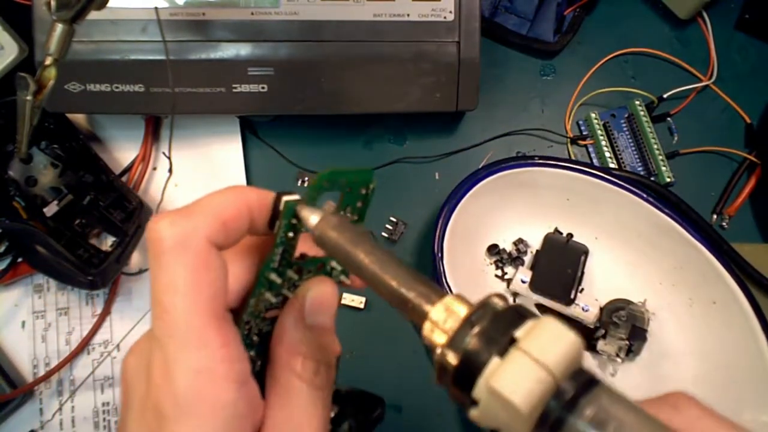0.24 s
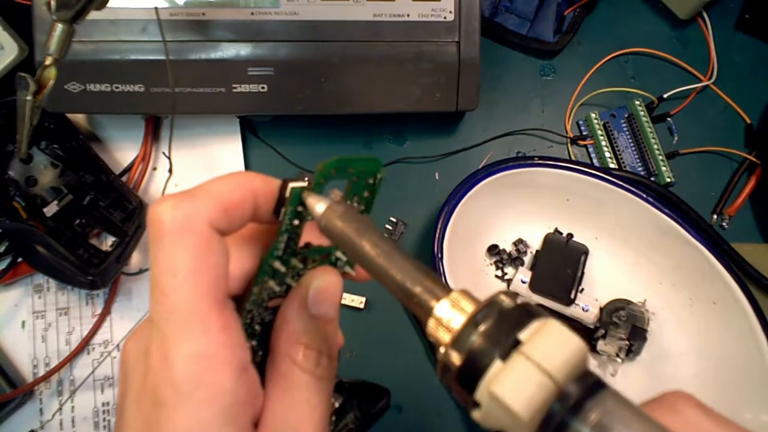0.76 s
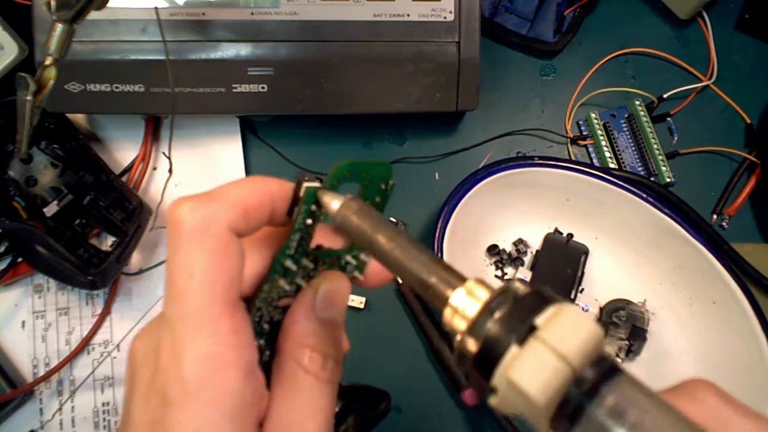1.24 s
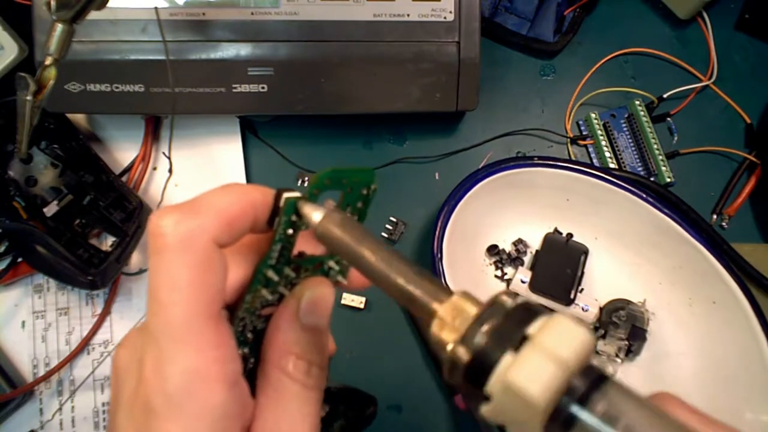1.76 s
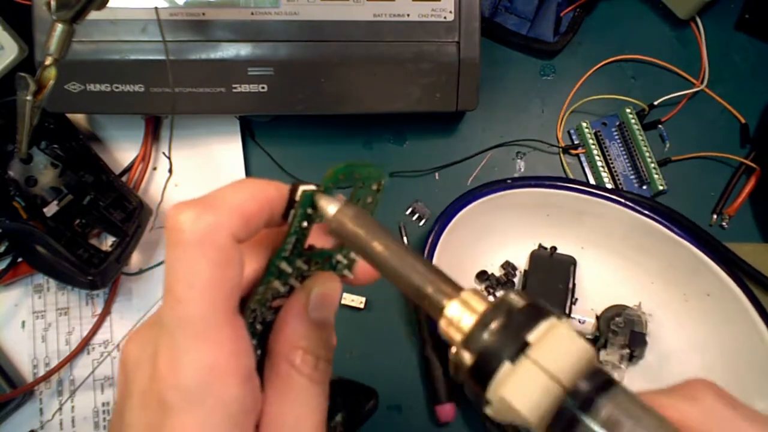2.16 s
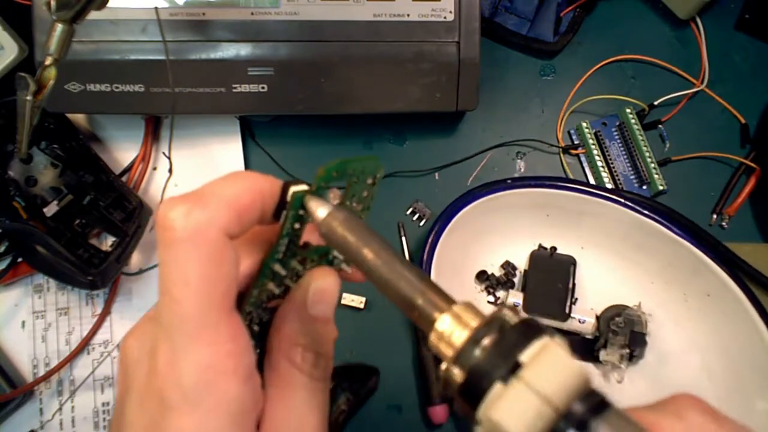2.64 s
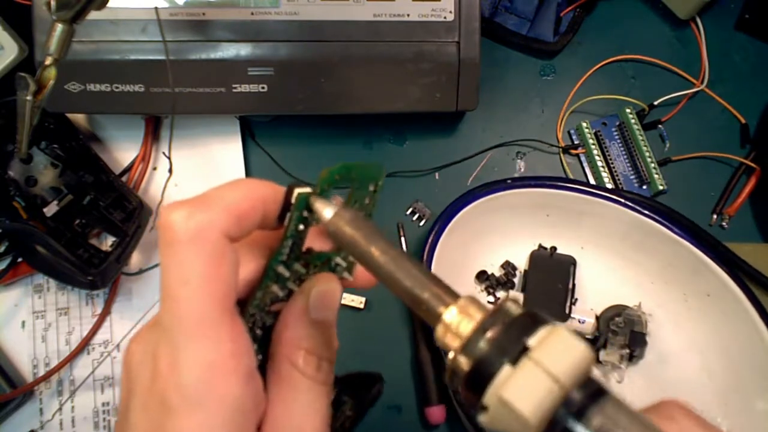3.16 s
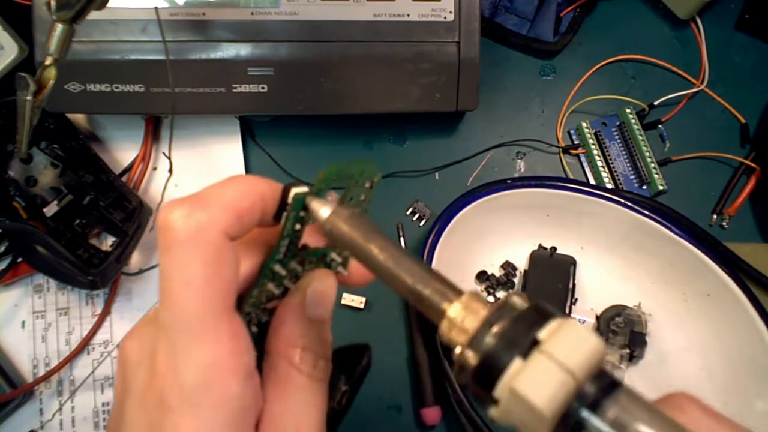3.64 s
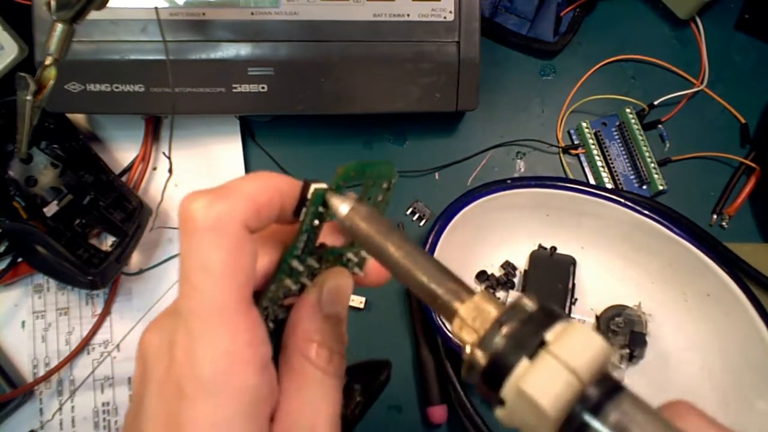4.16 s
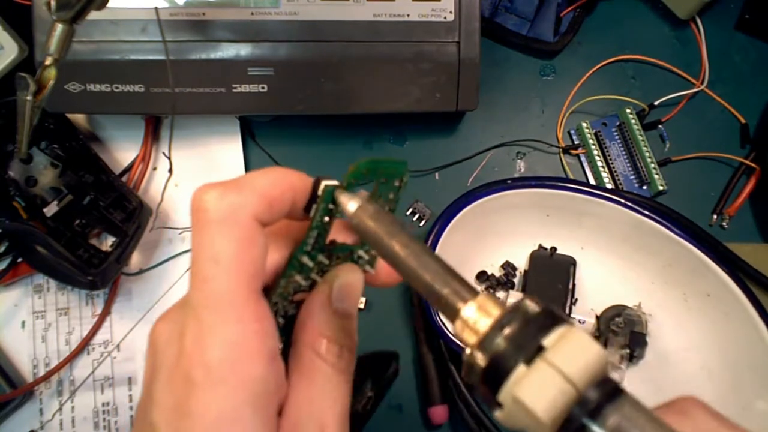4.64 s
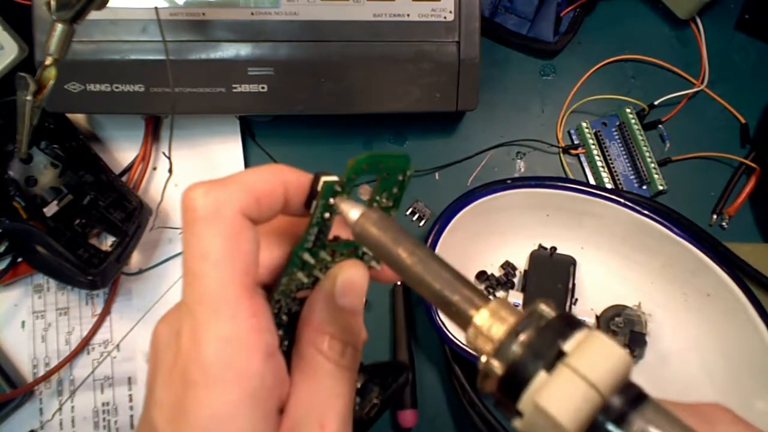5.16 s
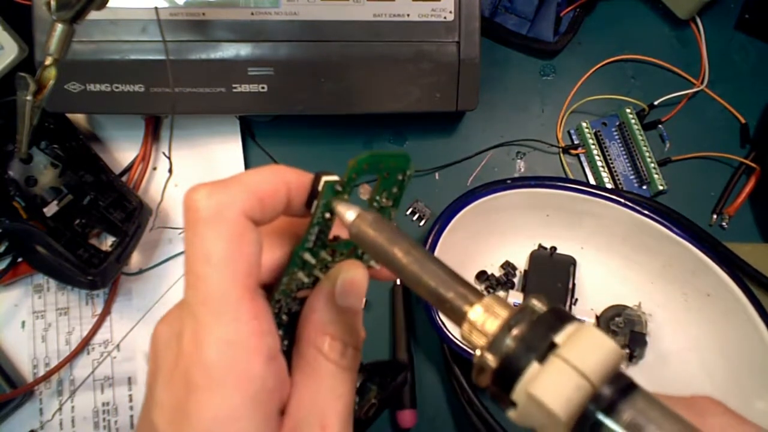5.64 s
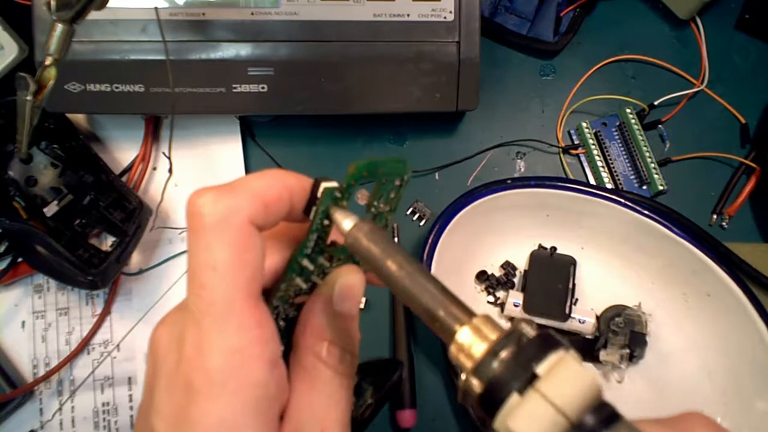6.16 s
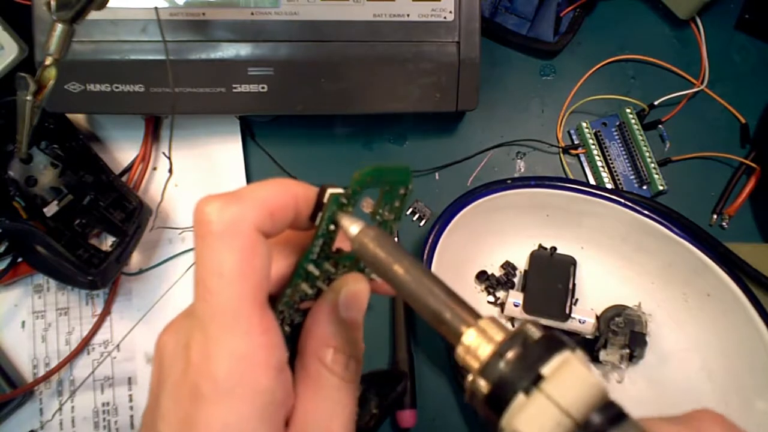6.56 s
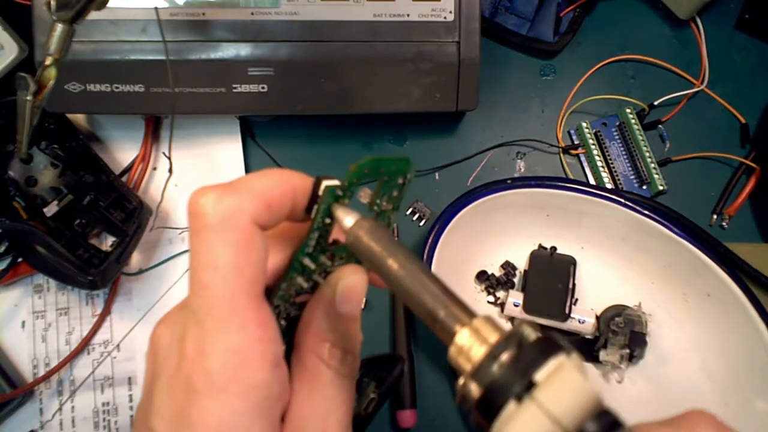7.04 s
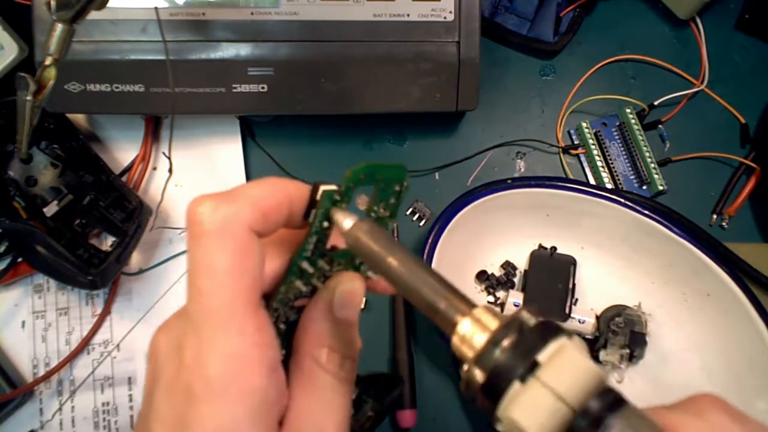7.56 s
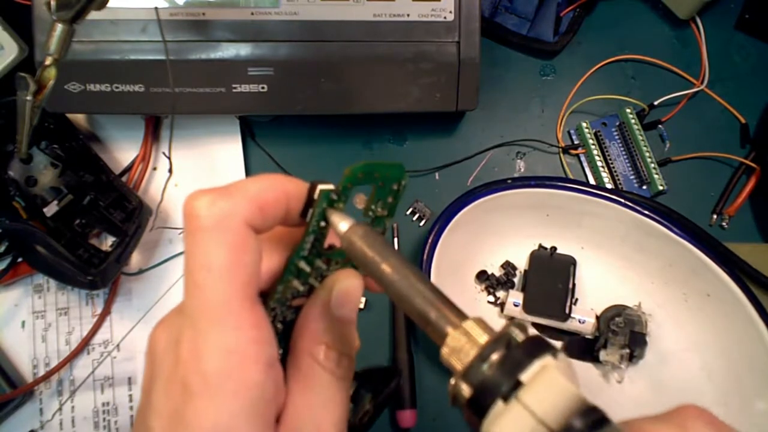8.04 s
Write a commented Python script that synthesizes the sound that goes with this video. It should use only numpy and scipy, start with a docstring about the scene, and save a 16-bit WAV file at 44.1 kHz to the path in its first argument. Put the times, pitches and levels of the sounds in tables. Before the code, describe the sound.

A steady soft fan and faint mains hum fill a small room. After a few solder ticks, a switch snaps and a diaphragm pump jumps into a harsh, rattling buzz, labouring under suction before running freer. It clicks off about four seconds later, coasting down with a thin hiss. Tiny ticks and spits follow, then another snap and the pump buzzes to the end. Close microphone.

```python
"""Desoldering gun at a bench

A trigger switch snaps and starts a diaphragm vacuum pump, twice. Each stroke puffs out air, a harmonic
series locked to the crank, and shakes the mechanism: contact clicks and air noise excite housing modes.
Solder spits and flux pops are short resonant noise bursts; the motor knocks in its mount at each start,
and a narrow hiss follows each stop. A fan (coloured noise) and mains hum (sines) run throughout."""
import sys
import numpy as np
from scipy import signal
from scipy.fft import rfft, irfft
from scipy.io import wavfile

SR = 44100
rng = np.random.default_rng(int(sys.argv[2]) if len(sys.argv) > 2 else 0)


def to_wav(s):
    """Save 16-bit WAV."""
    ch = np.atleast_2d(s).T  # columns
    pcm = np.round(np.clip(ch, -1, 1) * 32767)  # PCM
    wavfile.write(sys.argv[1], SR, pcm.astype(np.int16))


N = 366471
TIME = np.arange(N) / SR

# Fan noise spectrum: f/Hz, level/dB (relative spectral density)
FAN_SPECTRUM = [(30, -46), (120, -28), (200, -11.5), (380, -1), (600, -5.5), (950, -6.5), (1500, -6.5),
                (2450, -7.5), (2900, -15.5), (3600, -11.5), (4500, -16), (7500, -19.5), (9500, -24),
                (10800, -32.5), (15500, -41)]
# Fan resonances: f/Hz, width/Hz, level/dB (against the fan noise)
FAN_RESONANCES = [(364, 15, 3), (782, 7.4, 10), (1165, 21, -6), (1429, 10, 10.5), (1540, 22, 2),
                  (2330, 17, -10), (3380, 110, -12), (5000, 260, -0.5), (6370, 130, 1), (7400, 360, -5),
                  (8340, 120, -8), (9600, 110, 1)]
# Mains hum: f/Hz, level/dB (rms)
HUM_TONES = [(100, -79), (150, -73.5), (199.5, -67), (248.5, -64)]
# Solder spitting and the nozzle ticking on the joint:
# t/s, peak level/dB, f/Hz, width/Hz (of each of two resonator passes)
SOLDER_SPITS = [(0.201, -36, 3170, 4000), (0.787, -28, 6650, 5930), (0.909, -26, 5330, 700),
                (0.909, -29, 8000, 2500), (1.741, -32, 8800, 2980), (1.836, -25, 7150, 5500),
                (6.085, -45, 9000, 5010), (6.146, -39.5, 3000, 3000), (6.172, -46, 13100, 1000),
                (6.268, -44, 8500, 7000), (6.359, -50, 9200, 400), (6.365, -46, 9100, 400),
                (6.443, -51, 9200, 1500), (6.506, -44, 8500, 3000), (6.559, -45, 9200, 1200),
                (6.588, -51, 8600, 900), (6.622, -48, 8600, 500), (6.64, -32, 4300, 3200),
                (6.651, -48, 5200, 2800), (6.665, -41, 4080, 1000), (6.666, -47, 8900, 700),
                (6.8, -29, 6000, 5000), (6.813, -26, 5900, 5000), (6.8175, -27, 6450, 5000),
                (6.865, -32, 5700, 3500), (6.914, -29, 5300, 4100), (6.932, -30, 5200, 3000),
                (7.008, -40, 9000, 300), (7.09, -27, 7000, 7000), (7.131, -26, 5400, 4000)]
# Trigger switch snaps: t/s, peak level/dB, crack level/dB (against the modes), crack t60/s
SWITCH_SNAPS = [(0.6644, -22.5, 9, 0.013), (0.667, -18.5, 3, 0.009), (4.8494, -20, 8, 0.021),
                (4.873, -34, 3, 0.018), (6.6982, -25, 15, 0.022)]
# Modes of the switch: f/Hz, level/dB (relative), t60/s
SWITCH_MODES = [(1710, -11, 0.008), (3450, -6, 0.011), (4050, -2, 0.009), (5000, -14, 0.013),
                (5700, -14, 0.01), (6900, -9, 0.014), (8600, -15, .01)]
# Spectrum of the switch's crack: f/Hz, level/dB (relative spectral density)
CRACK_SPECTRUM = [(200, -14), (1000, -7), (2600, -5), (3600, 2.5), (8500, -1), (11000, -11.5), (15500, -17)]
# Trigger held: on t/s, off t/s, nozzle seal by solder/(0-1), joint opens t/s, vacuum bleed time/s,
# speed settling time/s, puff level/dB, rattle level/dB, resting crank angle/turns, flux pops/(1/s)
PUMP_RUNS = [(0.700, 4.858, 1, 2.68, 0.45, 0.122, -36.5, -34, 0.1, 10),
             (6.7224, 8.4, 0.4, 7.05, 0.12, 0.1, -36.5, -33.5, 0.56, 450)]
# Pump tones; the drive repeats every third stroke:
# f/(stroke rate), level running free/dB, level under suction/dB (both relative)
PUMP_TONES = [(2, -17.7, -17.5), (3, -11.8, -11.5), (4, -10, -8.5), (14 / 3, -32, -25), (5, -18.5, -18.5),
              (16 / 3, -38, -23), (17 / 3, -33, -23), (6, -28, -22), (7, -19, -17), (8, -19.5, -26),
              (9, -23, -12), (28 / 3, -36, -26), (29 / 3, -36, -21), (10, -20, -19), (32 / 3, -27, -15),
              (11, -17, -23), (35 / 3, -28, -7.5), (12, -4.5, -12), (38 / 3, -30, -12), (13, -6, -15),
              (40 / 3, -36, -18), (41 / 3, -36, -14), (14, -24, -22), (43 / 3, -34, -24),
              (44 / 3, -40, -19), (46 / 3, -36, -23), (47 / 3, -36, -21), (16, -20, -23), (20, -30, -21),
              (21, -22, -14.5), (23, -21, -25), (24, -28, -21), (27, -30, -21), (29, -17, -20),
              (33, -19, -20)]
# Rough tones of the bearing slipping with no load: f/(stroke rate), level/dB (relative)
BEARING_TONES = [(4.52, -18), (5.5, -17.5), (9.6, -19), (10.62, -13), (11.52, -10), (11.76, -14),
                 (12.42, -14), (13.5, -17), (16.1, -18), (16.9, -17)]
# Whine of the labouring motor: f/(stroke rate), level/dB (relative)
WHINE_PARTIALS = [(10, -4), (11, -12), (12, -5), (13, -3), (14, -2), (15, -7)]
# Resonances of the motor mount: f/Hz, width/Hz, level/dB (relative)
MOUNT_RESONANCES = [(785, 70, 0), (1055, 110, 2)]
# Low room modes: f/Hz, width/Hz, level/dB (against the direct sound)
LOW_ROOM_MODES = [(136.6, 7.8, 9.5), (161.2, 7.4, 9.5), (212, 6.6, 13), (242.2, 11.6, 6.5),
                  (309.8, 22.5, 3), (329.7, 6.2, -0.3)]
# Broad spectrum of the rattle: f/Hz, level/dB (relative spectral density)
RATTLE_SPECTRUM = [(30, -34), (75, -15), (140, -15.5), (260, 3.5), (450, -1), (560, -11), (780, -8),
                   (1200, -4), (1600, -4), (2200, -1), (3380, -1.5), (3530, -13), (4100, -9.5),
                   (5100, -10.5), (9300, -16.5), (10400, -22), (15500, -32.5)]
# Housing resonances: f/Hz, width/Hz, level/dB (relative), strongest drive/(turns after the puff)
HOUSING_MODES = [(382, 5.9, 11, 0.092), (744, 53, 3.5, 0.76), (893, 25, 12, 1), (943, 55, 11, 0.66),
                 (1005, 40, 5, 0.73), (1074, 70, 13, 0.56), (1290, 104, 3, 1), (1380, 40, 5.5, 0.55),
                 (1425, 16, 13, 0.54), (1780, 39, 2.5, 0.61), (1910, 150, 1.5, 1), (2041, 20, 9, 0.81),
                 (2094, 15.8, 11, 0.71), (2342, 6.5, -4, 0.79), (2391, 22, 9.5, 0.6), (2580, 38, 3, 0.36),
                 (2937, 46, 9, 0.51), (3016, 18, 6.5, 0.39), (3155, 21, 6, 0.61), (3306, 37, 9, 0.64),
                 (3375, 43, 8.5, 0.61), (4620, 130, -5, 0.98), (5420, 54, -7.5, 0.89),
                 (6250, 115, -12.5, 0.79), (6600, 200, -10.5, 0.5), (6830, 240, -6.5, 0.71),
                 (7490, 240, -5, 0.75), (9540, 42, -8, 0.77)]
# Knocks of the motor in its mount as the current comes on: t/s, peak level/dB
MOUNT_KICKS = [(0.7025, -28), (6.7235, -35)]

# the hot nozzle melts into the second joint
MELT_FROM_S, MELT_TO_S = 5.2, 7.5
# stroke rate: running free, gained per second of elapsed time as it warms, lost under full suction
FREE_HZ, WARM_HZ_PER_S, SUCTION_SAG_HZ = 82.5, 0.11, 1.4
# the motor jumps to this much below its speed, then closes the gap
START_LAG_HZ = 21
# puffs: build-up, decay on release (on top of the coast-down), least share left while coasting
PUFF_ATTACK_S, PUFF_RELEASE_DB_PER_S, PUFF_COAST_SHARE = 0.082, 217, 0.26
# rattle: share at the first stroke, rise, decay of its bright part on release
RATTLE_FIRST_SHARE, RATTLE_ATTACK_S, RATTLE_RELEASE_DB_PER_S = 0.5, 0.1, 111
# whine against the puffs: at speed, extra while labouring, and how long that lasts
WHINE_DB, WHINE_LABOUR_DB, LABOUR_S = -26, 26, 0.57
# linkage clatter against the valves; fade of the knocking as the motor coasts
LINKAGE_DB, COAST_FADE_S = 4.5, 0.13
# build-up of the drive's tones; swing of the housing's drive either way within each stroke
DRIVE_BUILD_S, RING_SWELL_DB = 0.22, 5
# high-pass corners: contact clicks, radiation from the small housing
CONTACT_LOW_HZ, RADIATED_LOW_HZ = 1350, 86
# hiss after the stop: top level, delay of its top, half length
LEAK_DB, LEAK_DELAY_S, LEAK_SPREAD_S = -58, 0.14, 0.13


def from_db(db):
    """Amplitude ratio: twenty decibels are a factor of ten."""
    return 10 ** (np.asarray(db) / 20)


def rms_one(x):
    """Power normalization to a root mean square of 1."""
    return x / np.sqrt(np.mean(x ** 2) + 1e-20)


def drift(rate):
    """Low-pass filtered noise: a smooth random course of spread 1."""
    step = 40
    r = np.exp(-2 * np.pi * step * rate / SR)
    noise = rng.standard_normal(N // step + 2002)
    slow = signal.lfilter([1], [1, -2 * r, r * r], noise)[2000:]
    return np.interp(np.arange(N) / step, np.arange(len(slow)), rms_one(slow))


def flutter(rate):
    """Complex random modulation: strength and phase both wander, with mean power 1."""
    return (drift(rate) + 1j * drift(rate)) / np.sqrt(2)


def colour(x, spectrum, size=4096):
    """Minimum-phase filtering: a folded cepstrum gives a causal filter of the wanted spectrum."""
    hz, db = np.transpose(spectrum)
    grid = np.maximum(np.arange(size // 2 + 1) * SR / size, 1)
    cepstrum = irfft(np.log(from_db(np.interp(np.log(grid), np.log(hz), db))))
    cepstrum[1:size // 2] *= 2
    cepstrum[size // 2 + 1:] = 0
    return signal.oaconvolve(x, irfft(np.exp(rfft(cepstrum))))[:N]


def resonance(x, hz, width):
    """Damped oscillator: a two-pole resonance with gain 1 at its peak."""
    r = np.exp(-np.pi * width / SR)
    zeros = np.array([1, 0, -1]) * (1 - r * r) / 2
    poles = [1, -2 * r * np.cos(2 * np.pi * hz / SR), r * r]
    return signal.lfilter(zeros, poles, x + 1e-18)


def high_pass(x, order, hz):
    """Butterworth high-pass: maximally flat above its corner."""
    return signal.sosfilt(signal.butter(order, hz, "high", fs=SR, output="sos"), x)


def add(out, s, sound, peak_db):
    """Superposition: add a short sound at a given time and peak level."""
    at = int(s * SR)
    out[at:at + len(sound)] += (from_db(peak_db) * sound / np.abs(sound).max())[:N - at]


def ringing_burst(length, hz, width_hz, t60):
    """Resonant excitation: decaying noise passes twice through one resonance."""
    t = TIME[:length]
    burst = rng.standard_normal(len(t)) * from_db(-60 * t / t60)
    return resonance(resonance(burst, hz, width_hz), hz, width_hz)


def since(s):
    """Elapsed time in seconds after a moment; zero before it."""
    return np.maximum(TIME - s, 0)


def run_in_force():
    """Piecewise-constant control: each run column per sample, from the latest press (first run before)."""
    rows = np.array(PUMP_RUNS)
    return rows[np.maximum(np.searchsorted(rows[:, 0], TIME) - 1, 0)].T


def background():
    """Broadband flow noise with faint resonances and slow level drift, plus steady mains hum."""
    air = colour(rng.standard_normal(N), FAN_SPECTRUM)
    fan = air + sum(from_db(db) * resonance(air, hz, width) for hz, width, db in FAN_RESONANCES)
    hum = sum(from_db(db) * np.sqrt(2) * np.sin(2 * np.pi * (hz * TIME + rng.random()))
              for hz, db in HUM_TONES)
    level_db = -50 + 0.9 * drift(0.85)
    return from_db(level_db) * rms_one(fan) + hum


def spits(t60):
    """Impulsive excitation: each spit is a tiny noise burst with a pitch of its own."""
    out = np.zeros(N)
    for s, peak_db, hz, width in SOLDER_SPITS:
        add(out, s, ringing_burst(SR // 20, hz, width, t60), peak_db)
    return out


def bench(x, wet_db, t60):
    """Diffuse reverberation: bench and nearby walls return an exponentially decaying noise tail."""
    t = TIME[:SR // 3]
    tail = rng.standard_normal(len(t)) * from_db(-60 * t / t60) * (t > .003)
    return x + from_db(wet_db) * signal.oaconvolve(x, tail / np.linalg.norm(tail))[:N]


def trigger(rise_s):
    """Modal impact: the switch snaps with a noisy crack and a few short modes."""
    out, t = np.zeros(N), TIME[:SR // 20]
    for s, peak_db, crack_db, crack_t60 in SWITCH_SNAPS:
        rings = sum(from_db(db - 60 * t / t60) * np.sin(2 * np.pi * hz * t) * rng.choice([-1, 1])
                    for hz, db, t60 in SWITCH_MODES)
        noise = from_db(crack_db - 60 * t / crack_t60) * rng.standard_normal(len(t))
        crack = colour(noise, CRACK_SPECTRUM)[:len(t)]
        # the contacts scrape home during the rise
        add(out, s, (rings + crack) * np.minimum(t / rise_s, 1), peak_db)
    return out


def crank(on, off, suction, lag_hz, spin_up_s, coast_s):
    """Rotation as integrated speed: spin-up, sag under suction, coasting; gives turns and motion gain."""
    speed = FREE_HZ + WARM_HZ_PER_S * TIME - SUCTION_SAG_HZ * suction - lag_hz
    rise = 1 - np.exp(-since(on) / spin_up_s)
    coast = np.clip(1 - since(off) / coast_s, 0, 1)
    return np.cumsum(speed * rise * coast) / SR, (TIME > on) * np.sqrt(coast)


def whine(angle, flutter_db):
    """Source and resonator: the motor's partials swell as they glide through the mount's resonances."""
    partials = sum(from_db(db + flutter_db * drift(8.0)) * np.cos(multiple * angle + rng.normal(0, 1))
                   for multiple, db in WHINE_PARTIALS)
    return sum(from_db(db) * resonance(partials, hz, width) for hz, width, db in MOUNT_RESONANCES)


def pump_tones(turns, suction, whine_db, wobble_turns, drive_db, rough, rough_rate,
               bearing_db, slip_rate, knock_turn):
    """Periodic flow gives steady low harmonics; the drive adds rough high ones, the bearing tones between."""
    angle = 2 * np.pi * (turns + wobble_turns * drift(12.0))
    knock_angle = angle - 2 * np.pi * knock_turn
    out = from_db(whine_db) * whine(knock_angle, flutter_db=0.0)  # 0 dB: steady partials
    up_to_speed = 1 - np.exp(-(since(run_in_force()[0]) / DRIVE_BUILD_S) ** 2)
    for multiple, free_db, loaded_db in PUMP_TONES:
        gain = from_db(free_db) + suction * (from_db(loaded_db) - from_db(free_db))
        if multiple <= 4:
            out += gain * np.cos(multiple * angle)
        else:
            swing = 1 + rough * flutter(rough_rate)
            phasor = np.exp(1j * (multiple * knock_angle + rng.normal(0, 1)))
            out += from_db(drive_db) * up_to_speed * gain * np.real(swing * phasor)
    slipping = sum(from_db(db) * np.real(flutter(slip_rate) * np.exp(1j * multiple * angle))
                   for multiple, db in BEARING_TONES)
    out += from_db(bearing_db) * (1 - suction) * up_to_speed * slipping
    # the small housing cannot radiate the deepest tones
    return np.sqrt(2) * high_pass(out, 2, RADIATED_LOW_HZ)


def room(x):
    """Modal room response: low modes swell as tones glide into them and ring on afterwards."""
    return x + sum(from_db(db) * resonance(x, hz, width) for hz, width, db in LOW_ROOM_MODES)


def contacts(turns, jitter_s, spread_db, count):
    """Cyclic impacts: parts touch at the same angles of every cycle, with random time and strength."""
    angles = (np.arange(count) + rng.random(count)) / count
    sizes = rng.choice([-1, 1], count) * rng.uniform(0.35, 1, count)
    due = np.arange(int(turns[-1]))[:, None] + angles
    time_chance, size_chance = rng.standard_normal((2, 1000, count))[:, :len(due)]  # up to 1000 cycles
    at = (np.interp(due, turns, TIME) + jitter_s * time_chance) * SR
    clicks = np.zeros(N)
    np.add.at(clicks, np.clip(at, 0, N - 1).astype(int), sizes * from_db(spread_db * size_chance))
    return rms_one(clicks)


def stroke(turns, peak_turn, depth_db):
    """Cyclic amplitude modulation: one swell a turn, strongest at the given crank angle."""
    return rms_one(from_db(depth_db * np.cos(2 * np.pi * (turns - peak_turn))))


def rattle(turns, dying, coasting, knock_db, air_db, ring_knock_db, ring_air_db, broad_db, ring_db,
           jolt_db, jolt_delay_s, jolt_s):
    """Forced vibration: contacts and rushing air shake the housing, which rings at its resonances."""
    valves = contacts(turns, jitter_s=.00007, spread_db=4.5, count=21)
    linkage = contacts(turns / 3, jitter_s=.00005, spread_db=2, count=90)  # repeats every third stroke
    # such light contacts excite only the upper range
    knocks = high_pass(rms_one(valves + from_db(LINKAGE_DB) * linkage), 6, CONTACT_LOW_HZ)
    shaken = from_db(knock_db) * knocks + from_db(air_db) * rng.standard_normal(N)
    shaken = shaken * stroke(turns, 0.85, 2.0)
    out = from_db(broad_db) * dying * colour(shaken, RATTLE_SPECTRUM)
    # the first, slow strokes thump the lower resonances one by one
    starting = sum(np.exp(-((TIME - on - jolt_delay_s) / jolt_s) ** 2) for on, *_ in PUMP_RUNS)
    jolt = 1 + from_db(jolt_db) * stroke(turns, 0.66, depth_db=6) * starting
    for hz, width, db, peak_turn in HOUSING_MODES:
        # the random sign sets how the flanks of neighbouring resonances add or cancel
        drive = from_db(ring_knock_db) * rng.choice([-1, 1]) * knocks
        drive = drive + from_db(ring_air_db) * rng.standard_normal(N)
        drive = drive * stroke(turns, peak_turn, RING_SWELL_DB)
        drive = drive * (jolt if hz < 1200 else 1) * (coasting if hz < 2200 else dying)
        out += from_db(ring_db + db) * resonance(drive, hz, width)
    return out


def pump():
    """Crank-locked excitation: puffs and rattle; suction holds until the joint opens, then bleeds away."""
    on, off, seal, opens, bleed_s, settle_s, puff_db, rattle_db, rest_turn, _ = run_in_force()
    suction = np.clip(seal, 0, 1) * np.exp(-since(opens) / bleed_s)
    lag_hz = START_LAG_HZ * np.exp(-since(on) / settle_s)
    turns, moving = crank(on, off, suction, lag_hz, spin_up_s=.02, coast_s=.3)
    turns = turns + rest_turn
    whine_db = WHINE_DB + WHINE_LABOUR_DB * np.exp(-(since(on) / LABOUR_S) ** 4)
    # with the power off the puffs and bright rattle die quickly; the lower knocking runs on while coasting
    dying = from_db(-RATTLE_RELEASE_DB_PER_S * since(off))
    coasting = np.exp(-(since(off) / COAST_FADE_S) ** 2)
    build_up = (1 - np.exp(-since(on) / PUFF_ATTACK_S)) ** 2
    release = np.maximum(from_db(-PUFF_RELEASE_DB_PER_S * since(off)), PUFF_COAST_SHARE * coasting)
    shaking = 1 - (1 - RATTLE_FIRST_SHARE) * np.exp(-since(on) / RATTLE_ATTACK_S)
    tones = from_db(puff_db) * build_up * release * pump_tones(
        turns, suction, whine_db, wobble_turns=0.0008, drive_db=-0.06, rough=0.24, rough_rate=10,
        bearing_db=-0.5, slip_rate=8.6, knock_turn=.62)
    shake = from_db(rattle_db) * shaking * rattle(
        turns, dying, coasting, knock_db=-1.5, air_db=-3.0, ring_knock_db=-2.5, ring_air_db=-4,
        broad_db=4.5, ring_db=4.5, jolt_db=2.5, jolt_delay_s=0.052, jolt_s=0.064)
    return room(moving * tones) + moving * shake


def kicks(hz, width_hz, t60):
    """Reaction to starting torque: the motor knocks dully against its mount at each start."""
    out = np.zeros(N)
    for s, peak_db in MOUNT_KICKS:
        add(out, s, ringing_burst(SR // 10, hz, width_hz, t60), peak_db)
    return out


def crackle(per_s, spread_db, hz, width_hz):
    """Random point process: boiling flux pops in tiny bright bursts of uneven size."""
    sizes = from_db(spread_db * np.minimum(rng.exponential(1, N), 3))
    pops = (rng.random(N) < per_s / SR) * sizes
    envelope = signal.lfilter([1], [1, -np.exp(-1 / (.001 * SR))], pops + 1e-18)  # 1 ms decay
    return resonance(envelope * rng.standard_normal(N), hz, width_hz)


def sizzle(drawn_db, melt_db, melt_per_s):
    """Rate-driven crackle: flux pops while air is drawn over it, and ticks sparsely as the joint melts."""
    on, off, *_, pops_per_s = run_in_force()
    drawn_rate = pops_per_s * (TIME > on) * (TIME < off)
    melt_rate = melt_per_s * (TIME > MELT_FROM_S) * (TIME < MELT_TO_S)
    drawn = crackle(drawn_rate, spread_db=4.0, hz=11400, width_hz=1500)
    melting = crackle(melt_rate, spread_db=2.2, hz=8930, width_hz=700)
    return from_db(drawn_db) * drawn + from_db(melt_db) * melting


def leak(hz, width_hz):
    """Narrow-band jet noise: air leaks back through the nozzle as the vacuum collapses after each stop."""
    swell = sum((TIME > off) * np.exp(-((TIME - off - LEAK_DELAY_S) / LEAK_SPREAD_S) ** 2)
                for _, off, *_ in PUMP_RUNS)
    hiss = resonance(resonance(rng.standard_normal(N), hz, width_hz), hz, width_hz)
    return from_db(LEAK_DB) * swell * rms_one(hiss)


def scene():
    """Linear superposition of all sources; only the short sounds excite the bench's tail."""
    clicks = trigger(rise_s=0.0009) + kicks(hz=1150, width_hz=750, t60=0.096) + spits(t60=0.014)
    clicks = clicks + sizzle(drawn_db=-51, melt_db=-52, melt_per_s=17)
    gun = pump() + leak(hz=5140, width_hz=890)
    return (gun + bench(clicks, wet_db=-10, t60=0.62) + background())[None]


def record(dry):
    """Band limiting: a steep elliptic low-pass cuts the top."""
    return signal.sosfilt(signal.ellip(10, .1, 80, 15900, fs=SR, output="sos"), dry)


dry = scene()
out = record(dry)
to_wav(out)
```